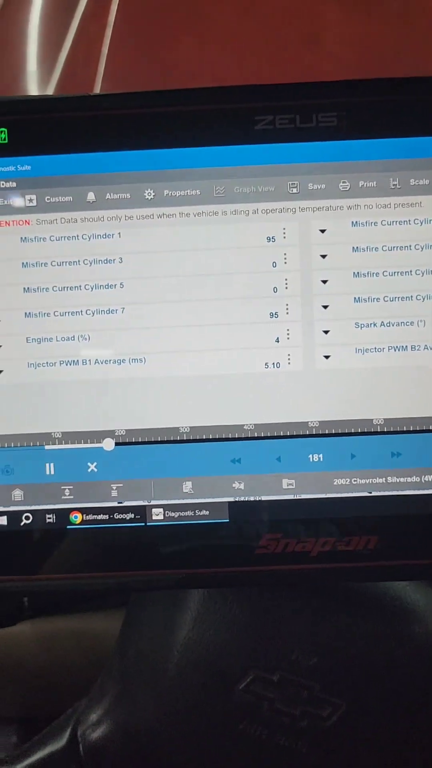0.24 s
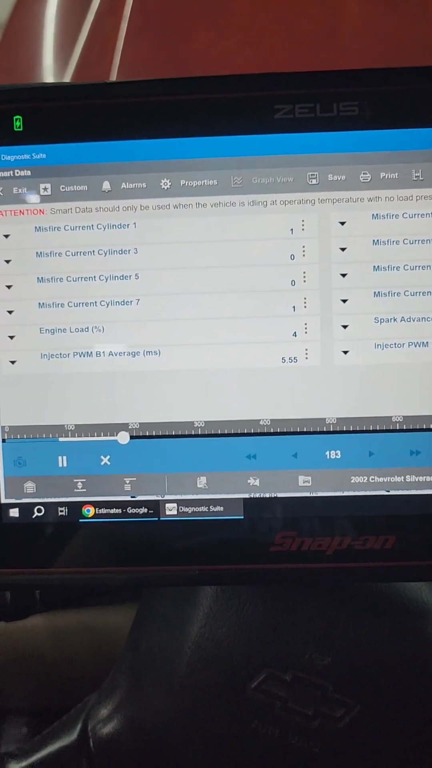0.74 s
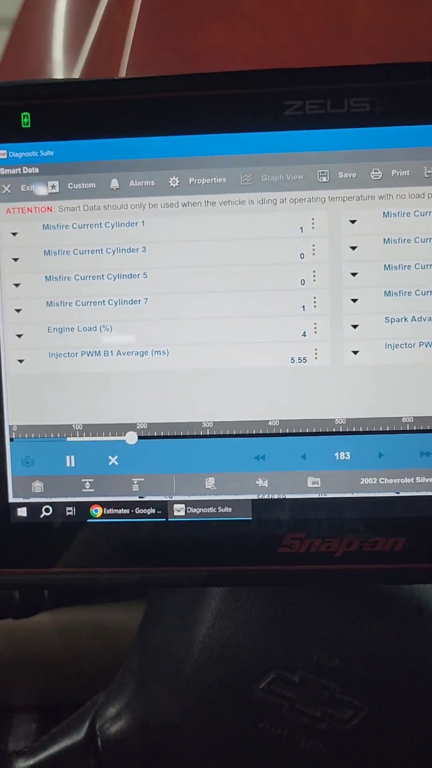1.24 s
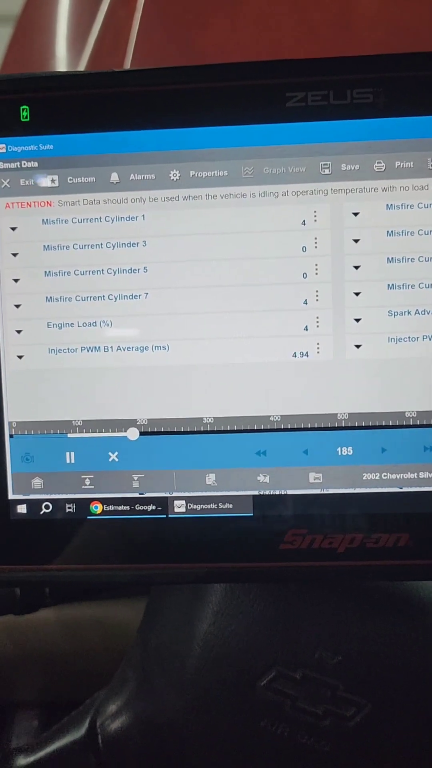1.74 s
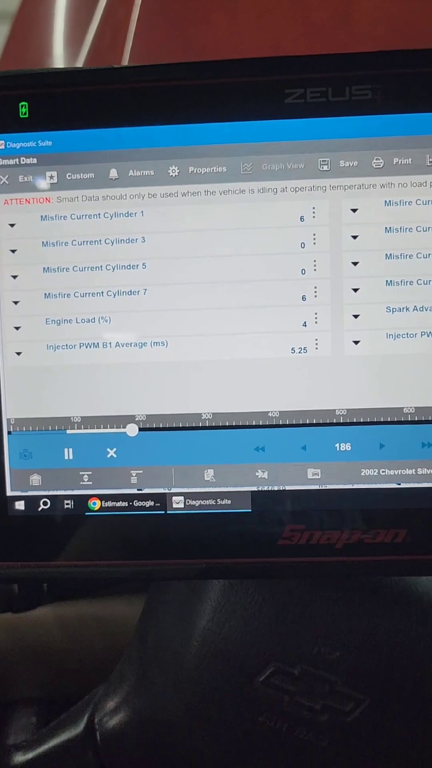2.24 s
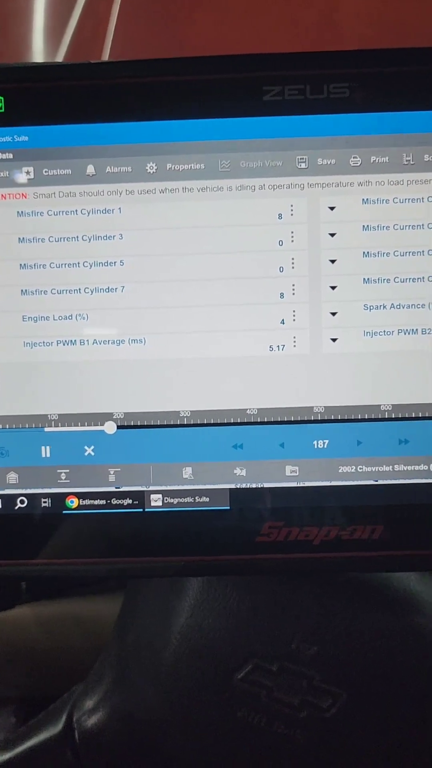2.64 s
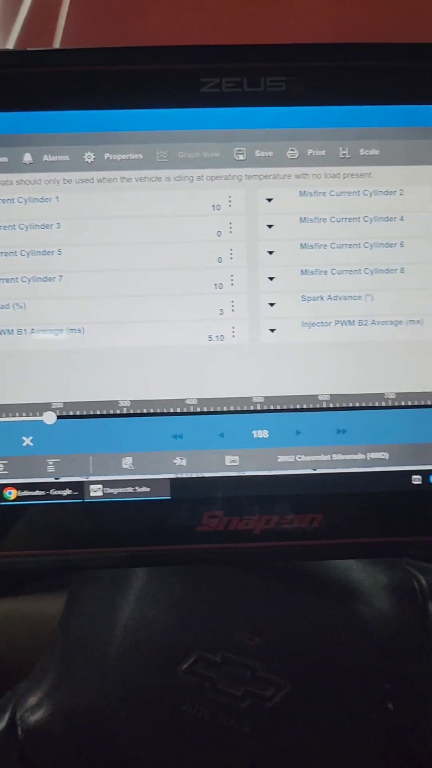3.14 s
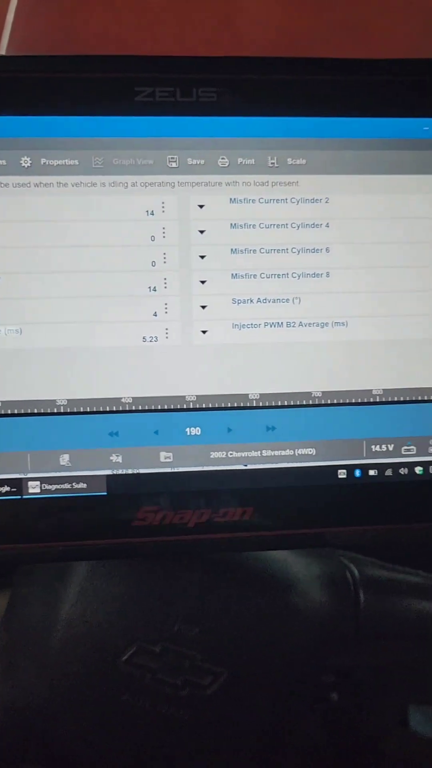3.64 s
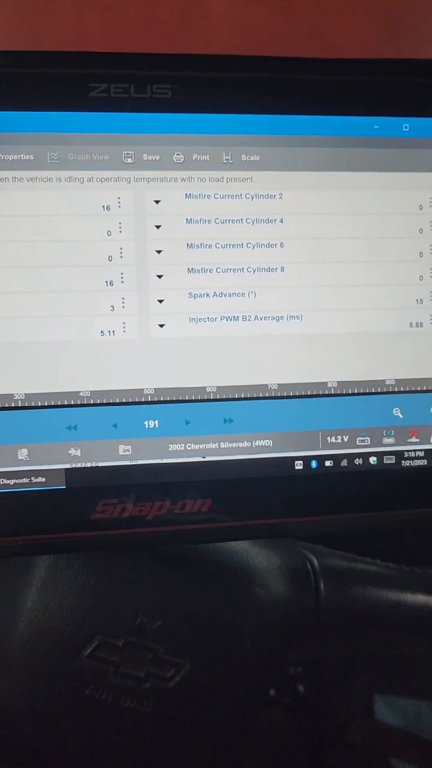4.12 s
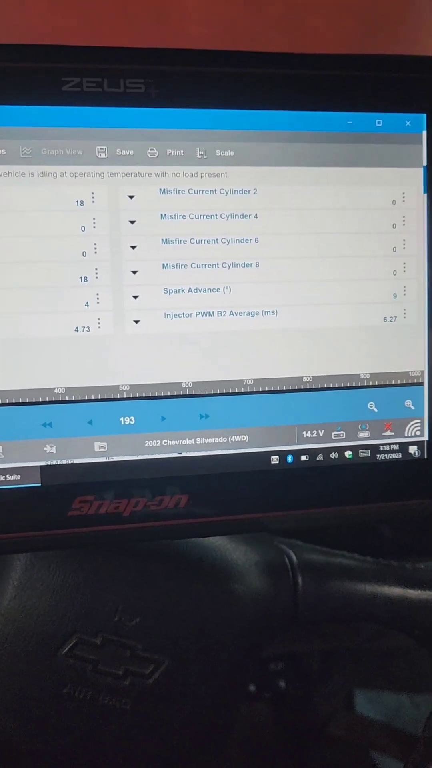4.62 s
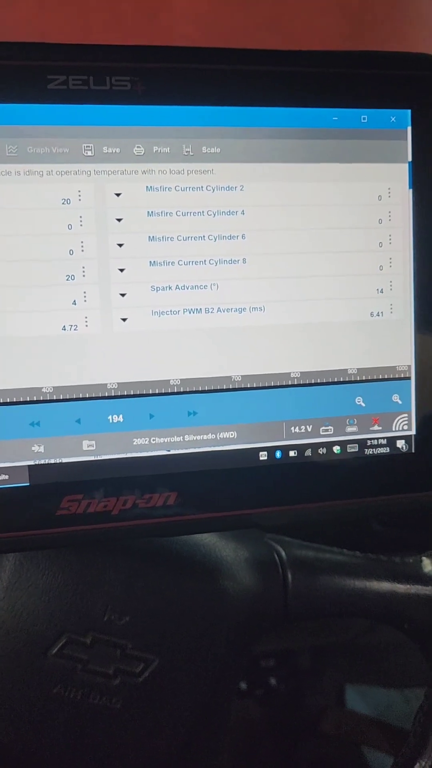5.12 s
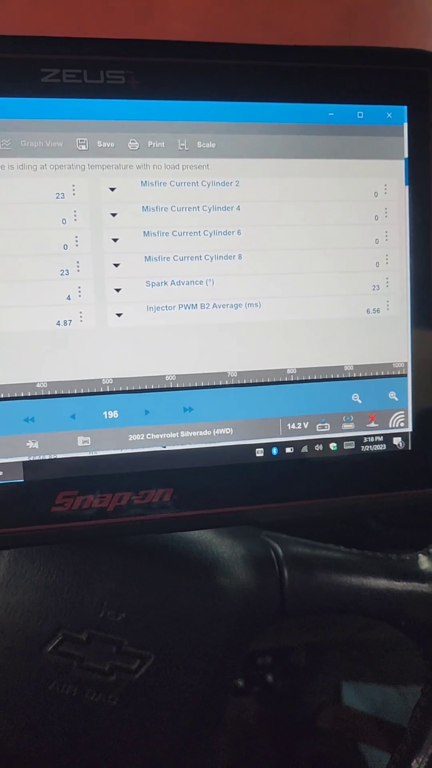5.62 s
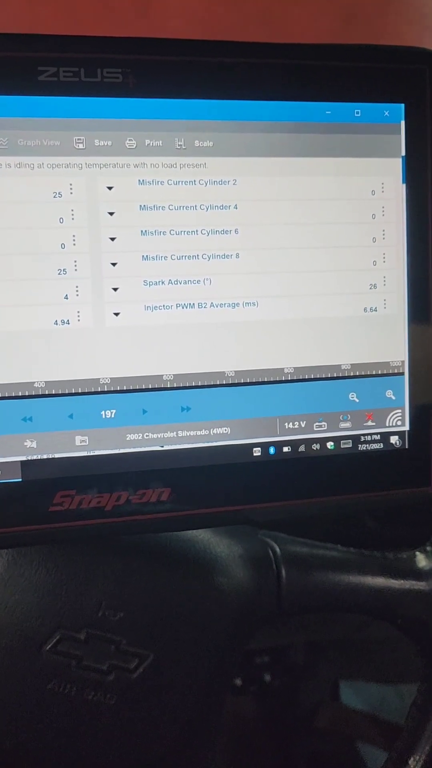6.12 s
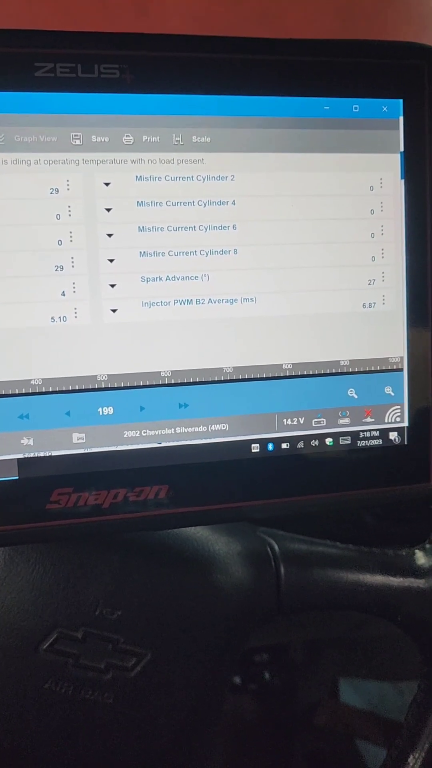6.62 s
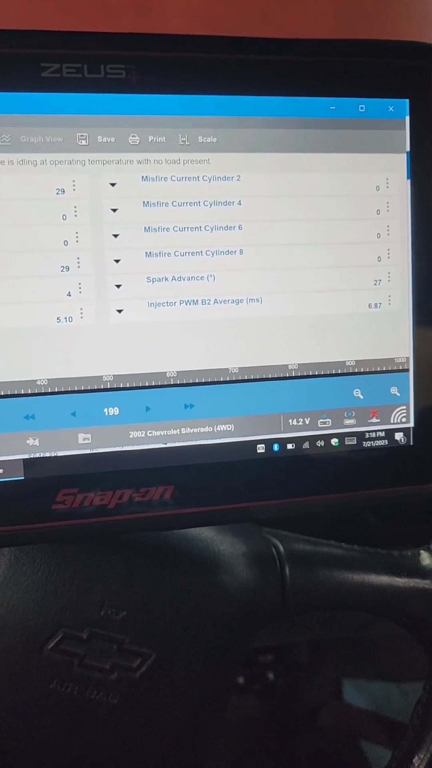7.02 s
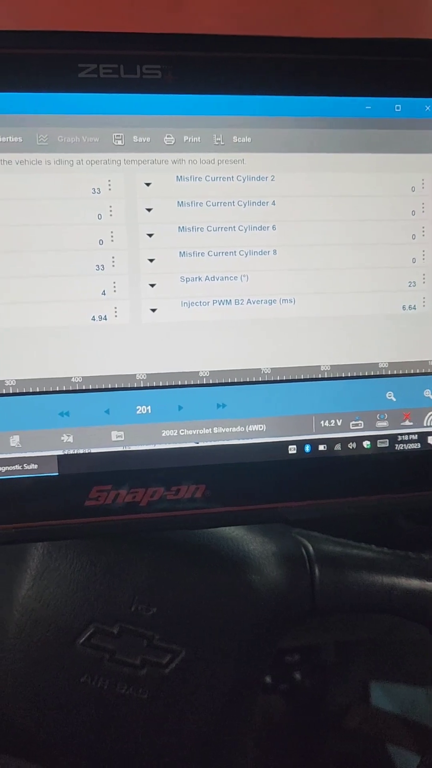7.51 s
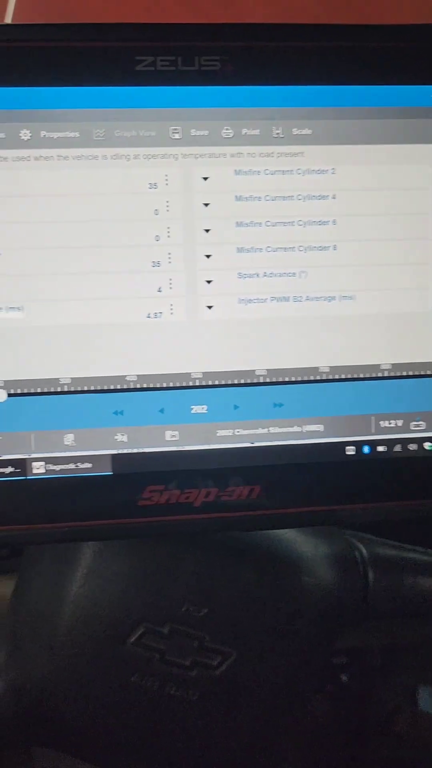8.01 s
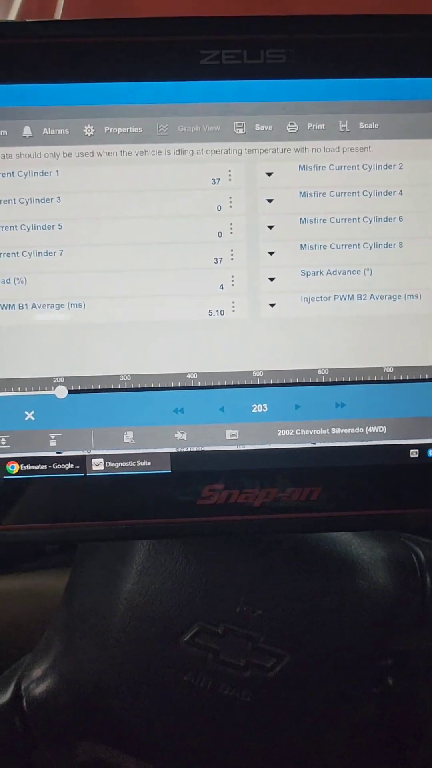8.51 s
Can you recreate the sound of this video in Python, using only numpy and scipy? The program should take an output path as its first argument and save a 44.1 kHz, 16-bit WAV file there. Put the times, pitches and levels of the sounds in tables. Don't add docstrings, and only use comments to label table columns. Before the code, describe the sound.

Heard from the cab, a misfiring truck engine idles steadily with low uneven throbbing, rumble, intake hiss, light valve ticks and occasional loose knocks.

```python
import sys
import numpy as np
from scipy import signal
from scipy.fft import rfft, irfft, next_fast_len
from scipy.io import wavfile
from scipy.ndimage import uniform_filter1d, map_coordinates

SR = 44100
rng = np.random.default_rng(int(sys.argv[2]) if len(sys.argv) > 2 else 0)


def decibels_to_gain(level_db):
    exponent = np.asarray(level_db, float) / 20
    return 10 ** exponent


def master(y):
    cut = np.clip(np.atleast_2d(y).T, -1, 1)
    pcm = np.round(cut * 32767)
    wavfile.write(sys.argv[1], SR, pcm.astype(np.int16))


N = 386310

# (time [s], level [dB])
OPENNESS = [(0, 0.5), (.45, 0.15), (1.3, 0), (1.9, 0.2), (2.7, -0.05), (3.6, -0.7), (4.3, -1.2), (5.1, 0),
            (5.9, -0.9), (6.9, -1), (7.4, -.5), (8.0, -0.5), (8.5, 0), (8.76, -0.5)]


def unit(x):
    return x / np.sqrt(np.mean(x ** 2) + 1e-20)


def along(points, hz):
    f, v = np.transpose(points)
    return np.interp(np.log(hz + 1), np.log(f + 1), v)


def curves(rows):
    s, *cols = np.transpose(rows)
    return [np.interp(np.arange(N) / SR, s, c) for c in cols]


def wobble(rate):
    knots = rng.standard_normal(int(N * rate / SR) + 4)
    return map_coordinates(knots, [np.arange(N) * rate / SR])


def filtered(x, response):
    m = next_fast_len(x.shape[-1] + SR // 2)
    spectrum = rfft(x, m) * response(np.fft.rfftfreq(m, 1 / SR))
    return irfft(spectrum, m)[..., :x.shape[-1]]


def resonance(f, hz, width):
    return 1j * f * width / (hz * hz - f * f + 1j * f * width)


def rush(gain, patchy_db):
    # (frequency [Hz], likeness [0-1])
    likeness = [(60, .985), (130, .975), (290, .88), (640, .5), (1410, .12), (3100, 0)]
    # (frequency [Hz], level difference [dB])
    lean = [(40, .3), (150, .5), (350, -1.2), (700, -2.7), (1400, -5), (2800, -10.2), (7000, -12.5),
            (8000, -20), (10400, -19), (11400, -13), (14700, -13.5), (15400, -25)]
    z = signal.stft(rng.standard_normal((2, N)), nperseg=512)[2]
    field = uniform_filter1d(rng.standard_normal(z.shape[1:]), 6, 0)
    field = uniform_filter1d(field, 12, 1)
    pair = signal.istft(z * decibels_to_gain(patchy_db * unit(field)), nperseg=512)[1][:, :N]

    def spread(hz):
        angle = np.arccos(np.clip(along(likeness, hz), -1, 1)) / 2
        return gain(hz) * [np.cos(angle), np.sin(angle)]

    mid, side = filtered(pair, spread)
    both = np.array([mid + side, mid - side])
    both = filtered(both, lambda hz: decibels_to_gain(along(lean, hz) * [[.5], [-.5]]))
    return both / np.std(both.mean(0))


def note(hz, stray_hz, rate):
    return np.sqrt(2) * np.sin(2 * np.pi * np.cumsum(hz + stray_hz * wobble(rate)) / SR)


def firings(jitter_deg, scatter_db):
    # (time [s], speed [rpm])
    crank_speed = [(0.0, 620.1), (0.75, 623.8), (1.75, 618.8), (2.0, 624.5), (2.25, 603.0), (2.75, 615.1),
                   (3.5, 608.6), (4.0, 634.6), (4.51, 611.5), (5.01, 612.1), (6.26, 608.9), (6.76, 596.8),
                   (7.01, 611.5), (7.51, 609.2), (7.76, 599.7), (8.76, 620.9)]
    # (crank angle [deg], strength [dB], bank [0-1])
    cylinders = [
        (57.1, -6.0, 0),
        (143.3, -5.8, 1),
        (224.5, 1.4, 0),
        (330.5, -9.2, 1),
        (422.7, -5.5, 1),
        (497.9, -16.2, 0),
        (621.5, -1.1, 1),
        (681.1, -1.4, 0),
    ]
    rpm = np.pad(curves(crank_speed)[0], (SR, 0), "edge")
    cycles = np.cumsum(rpm) / SR / 120
    cycles -= cycles[SR]
    angle, db, bank = np.transpose(cylinders)
    turn = np.arange(-5, int(cycles[-1]) + 1)[:, None]
    chance = rng.standard_normal((len(turn), len(angle), 2))
    when = turn + (angle + jitter_deg * chance[..., 0]) / 720
    at = np.interp(when, cycles, np.arange(len(rpm)), right=0)
    size = decibels_to_gain(db + scatter_db * chance[..., 1]) * (at > 0)

    def train(b):
        mine = bank == b
        return np.bincount(at[:, mine].astype(int).ravel(), size[:, mine].ravel(), len(rpm))

    return np.array([train(b) for b in range(2)])


def throb(blows, lag, length):
    swell = signal.fftconvolve(blows, np.hanning(round(length * SR)))[:len(blows)]
    return unit(np.roll(swell - swell.mean(), round(lag * SR))[SR:])


def singing():
    # (time [s], lift over rest [dB], length [s])
    swells = [(.15, 5.5, 0.25), (.97, 7, 0.47), (1.722, 6.5, 0.28), (2.15, 5, 0.37), (2.645, 8, .35),
              (3.05, 3, 0.18), (4.003, 6.5, .5), (4.62, 8, .25), (5.2, 5.5, 0.68), (6.35, 6.5, 0.71),
              (7.547, 7, 0.17), (8.167, 5, 0.24)]
    t = np.arange(N) / SR
    lift = sum(db * np.exp(-(2 * (t - s) / length) ** 2) for s, db, length in swells)
    return -48.5 + 1.5 * curves(OPENNESS)[0] + lift


def hum():
    panel = decibels_to_gain(singing() - 3.5 + 1.5 * wobble(11)) * note(424.5, stray_hz=3.8, rate=10)
    drone = decibels_to_gain(-34.3 + 1.2 * wobble(9)) * note(153.5, stray_hz=4, rate=12)
    return panel * decibels_to_gain([[-1.1], [1.1]]) + drone * decibels_to_gain([[.7], [-.7]])


def intake(blows):
    # (frequency [Hz], density [dB per Hz])
    hiss_colour = [(8000, -75), (9600, -18), (10400, -19), (11100, -6), (12100, 1.5), (13000, -3),
                   (14500, -5.5), (15800, -18)]
    breath = .4 * throb(blows[1], lag=.031, length=.07) + .7 * throb(blows[0], lag=.03, length=.16)
    flutter = 0.23 * wobble(5) + .5 * wobble(30)
    level_db = -56 + 1.2 * curves(OPENNESS)[0] + breath + flutter
    return decibels_to_gain(level_db) * rush(lambda hz: decibels_to_gain(along(hiss_colour, hz)), patchy_db=0.5)


def ticks(blows):
    # (time [s], peak [dB], left over right [dB], ring [Hz])
    knocks = [(0.058, -36, -6.5, 560), (1.975, -38, -7.0, 678), (2.064, -36, -6.0, 557),
              (2.245, -34, -6.0, 589), (3.076, -37, -6.5, 576), (4.135, -37, -7.0, 595),
              (6.538, -37, -7.5, 735), (7.85, -36, -3.5, 611), (7.875, -32, -2.0, 552),
              (8.017, -33, -3.5, 1020), (8.056, -33, -4.5, 600), (8.158, -35, -4.5, 659)]
    t = np.arange(SR // 40) / SR
    seats = np.roll(blows.sum(0) > 0, round(0.022 * SR))[SR:]
    seats = seats * decibels_to_gain(-63 + 3.1 * rng.standard_normal(N))
    hits = seats * decibels_to_gain([[-4.5], [4.5]])
    rings = np.zeros((2, N))
    for s, db, pan_db, hz in knocks:
        start = round(s * SR)
        size = decibels_to_gain(db + pan_db * np.array([[.5], [-.5]]))
        hits[:, start] += size[:, 0]
        rings[:, start:][:, :len(t)] += decibels_to_gain(-1.5 - 60 * t / .035) * size * np.sin(2 * np.pi * hz * t)
    snap = rng.standard_normal((2, len(t))) * decibels_to_gain(-60 * t / .005)
    dry = signal.fftconvolve(hits, snap, axes=1)[:, :N] + decibels_to_gain(13) * hits
    metal = lambda f: resonance(f, 900, 900) ** 2 + decibels_to_gain(-7) * resonance(f, 3200, 2500) ** 3
    return rings + filtered(dry, metal)


def block(blows):
    # (frequency [Hz], density [dB per Hz])
    rumble_colour = [(12, -40), (30, -17), (60, -11), (77, -4), (90, -10), (115, 0), (132, -4), (153, -3),
                     (195, -11), (215, -7.5), (240, -12), (264, -8), (295, -15.5), (500, -24)]
    roar_colour = [(250, -60), (400, -5), (560, -8), (900, -9.5), (1500, -13.5), (1900, -17.5), (2600, -22),
                   (4300, -23), (4950, -34.5), (7400, -35.5), (8000, -47), (8500, -52.5), (9500, -22),
                   (11000, -100)]
    # (frequency [Hz], width [Hz], level over the roar [dB])
    panels = [(420, 24, 7), (665, 14, 5), (1310, 18, 4), (1590, 30, 4), (1680, 40, 8), (2785, 22, 6),
              (3625, 90, 3), (4750, 300, -1), (6200, 50, 5), (6410, 50, 3)]
    rumble = rush(lambda hz: decibels_to_gain(along(rumble_colour, hz)) / (1 + (hz / 620) ** 8), patchy_db=.3)

    def ringing(hz):
        return np.sqrt(1 + sum(decibels_to_gain(2 * db) * abs(resonance(hz, c, w)) ** 2 for c, w, db in panels))

    roar = rush(lambda hz: decibels_to_gain(along(roar_colour, hz)) * ringing(hz), patchy_db=1.03)
    bright = filtered(roar, lambda hz: 1 / (1 + (2200 / (hz + 1)) ** 4))
    heave = decibels_to_gain(.75 * throb(blows[0], lag=.046, length=.16))
    every = blows.sum(0)
    rumble_db = -31.6 + 1.2 * throb(every, lag=.011, length=.03)
    roar_db = -43.5 + curves(OPENNESS)[0] + 0.41 * throb(every, lag=0.032, length=0.028)
    roar_db = roar_db + 0.18 * wobble(5.1)
    return decibels_to_gain(rumble_db) * rumble + decibels_to_gain(roar_db) * (roar + (heave - 1) * bright)


def exhaust(blows):
    # (frequency [Hz], width [Hz], level [dB])
    pipe_a = [(24.5, 6, -33.9), (45.8, 6, -30.8), (52, 6.8, -31.1), (68, 7.3, -42.4), (84, 25.8, -45.8),
              (117.9, 6, -40), (155.2, 7, -41.5)]
    pipe_b = [(18.0, 9.8, -38.4), (45.6, 35.5, -38.8), (68.0, 46.4, -32.6), (84.0, 6.0, -33.0),
              (87.2, 6.0, -40.9), (105.0, 60.0, -39.8), (150.2, 57.1, -43.4)]

    def pipe(f, modes):
        return sum((-1) ** k * decibels_to_gain(db) * resonance(f, hz, w) for k, (hz, w, db) in enumerate(modes))

    def both_pipes(f):
        low_cut = (1j * f / (14 + 1j * f)) ** 2
        return np.array([pipe(f, pipe_a), pipe(f, pipe_b)]) * low_cut

    boom = filtered(blows, both_pipes)
    low_boom = filtered(boom.sum(0), lambda f: 1 / (1 + (f / 215) ** 8))
    skew = lambda f: decibels_to_gain(along([(30, -18), (80, -24), (200, -20)], f)) * np.exp(-1.2j)
    return decibels_to_gain(73) * filtered(low_boom, lambda f: np.array([1 + skew(f), 1 - skew(f)]))[:, SR:]


def scene():
    blows = firings(jitter_deg=2, scatter_db=1.3)
    return exhaust(blows) + block(blows) + hum() + intake(blows) + ticks(blows)


def band_limit(x):
    return signal.sosfilt(signal.butter(12, 15545, fs=SR, output="sos"), x)


def record(dry):
    # (frequency [Hz], level [dB])
    treble_dip = [(7850, 0), (8350, -14), (9800, -10), (10250, 0)]
    heard = filtered(dry, lambda hz: decibels_to_gain(along(treble_dip, hz)))
    return band_limit(heard)


dry = scene()
out = record(dry)
master(out)
```